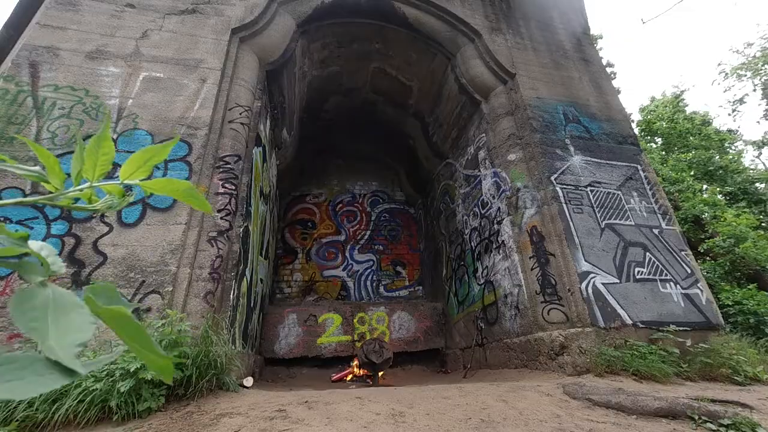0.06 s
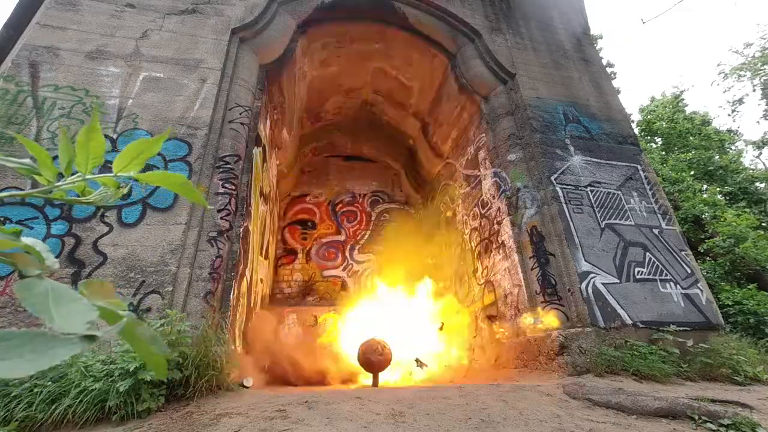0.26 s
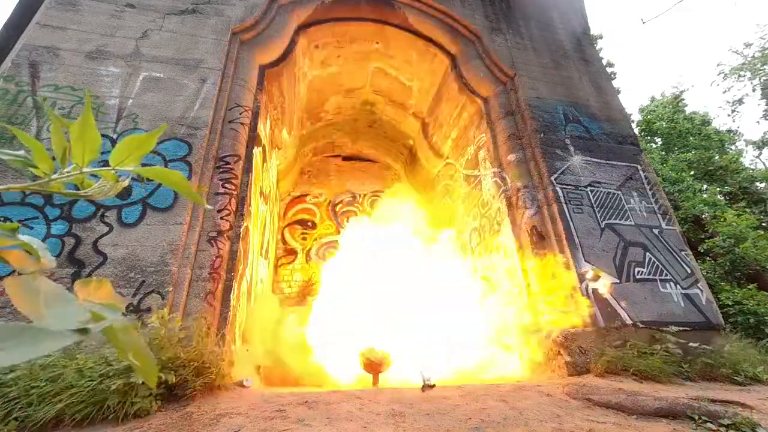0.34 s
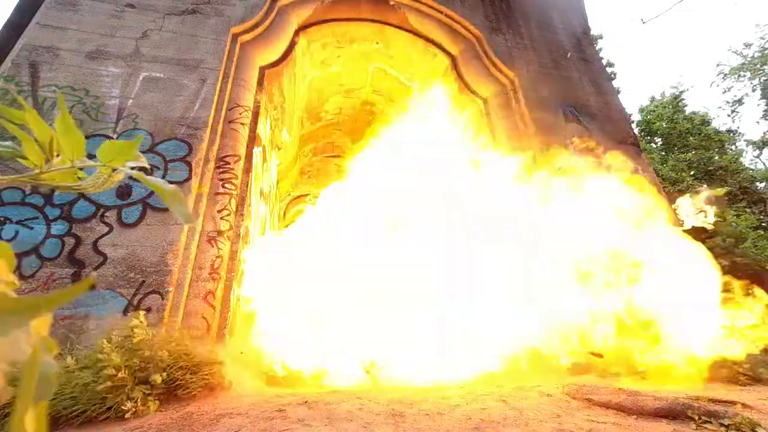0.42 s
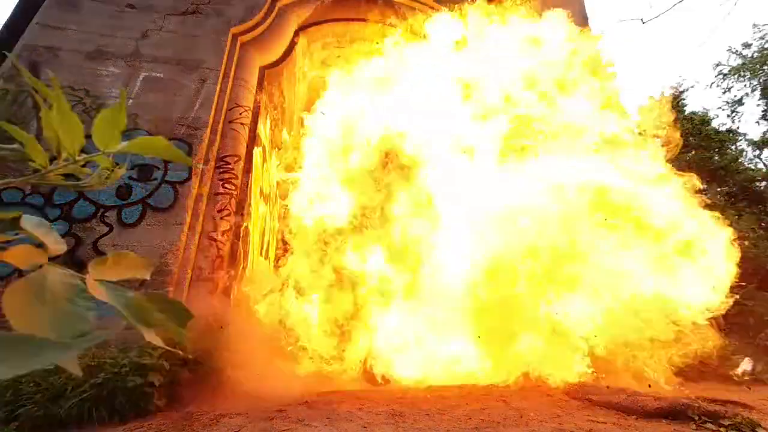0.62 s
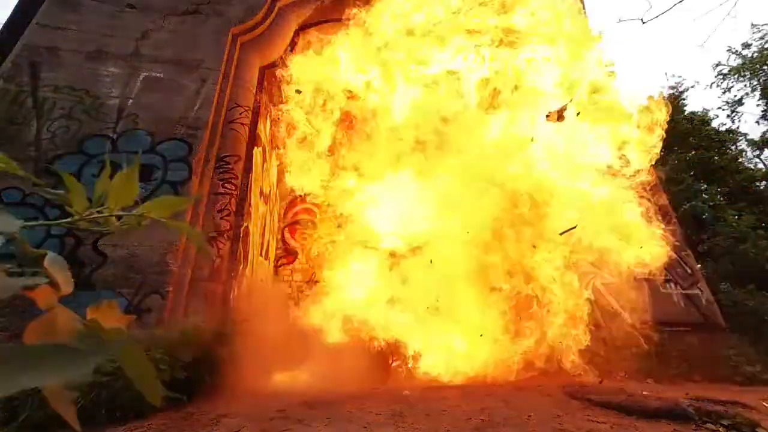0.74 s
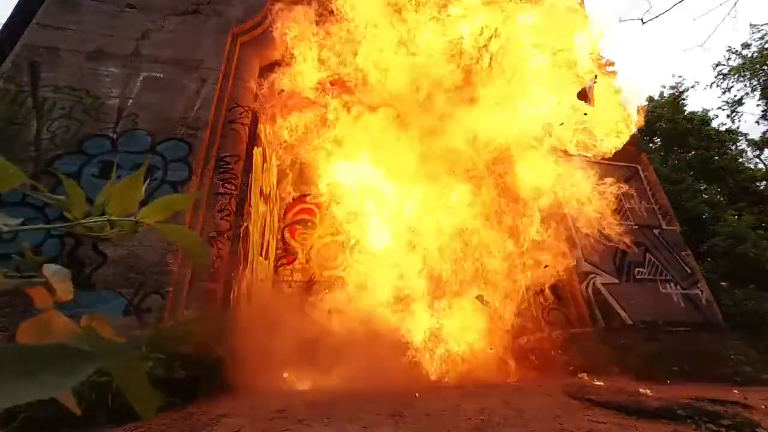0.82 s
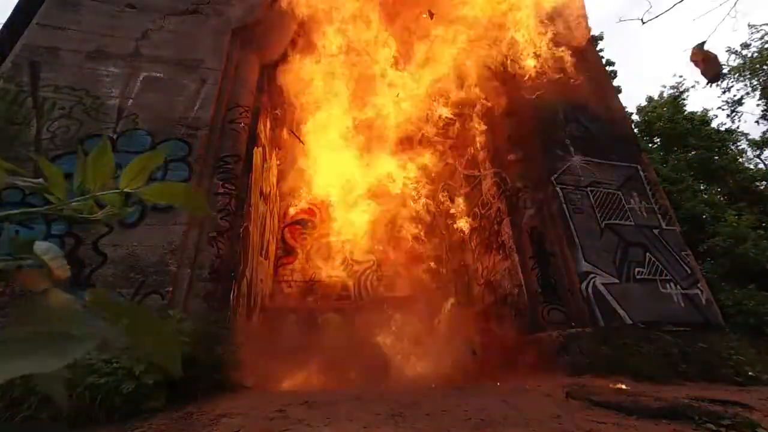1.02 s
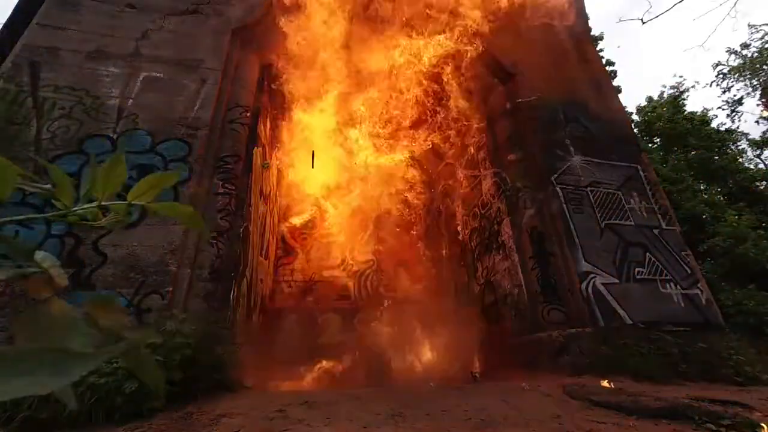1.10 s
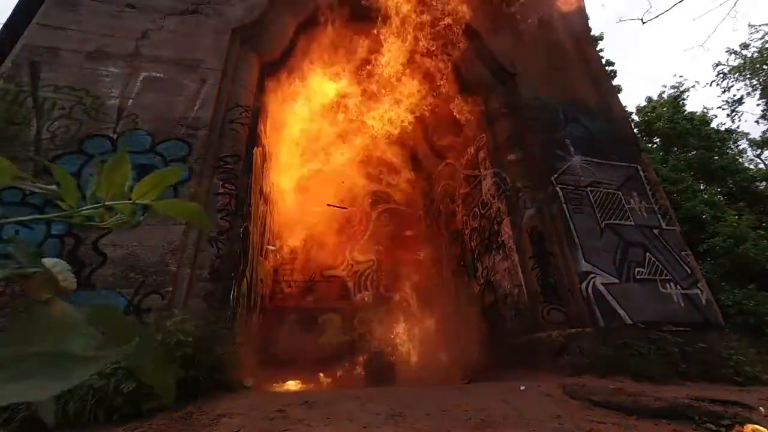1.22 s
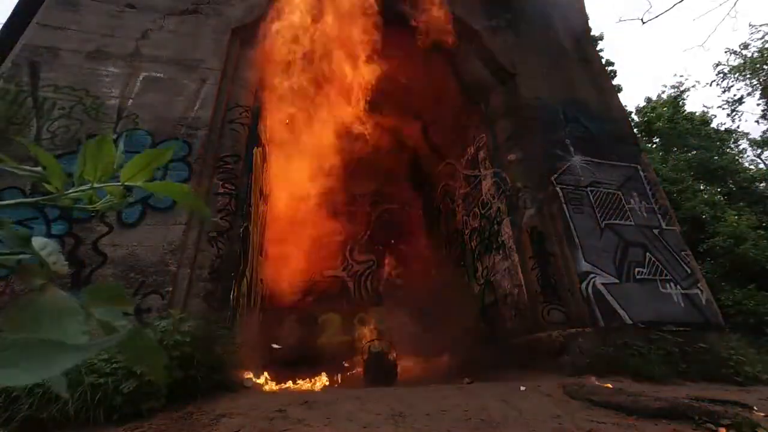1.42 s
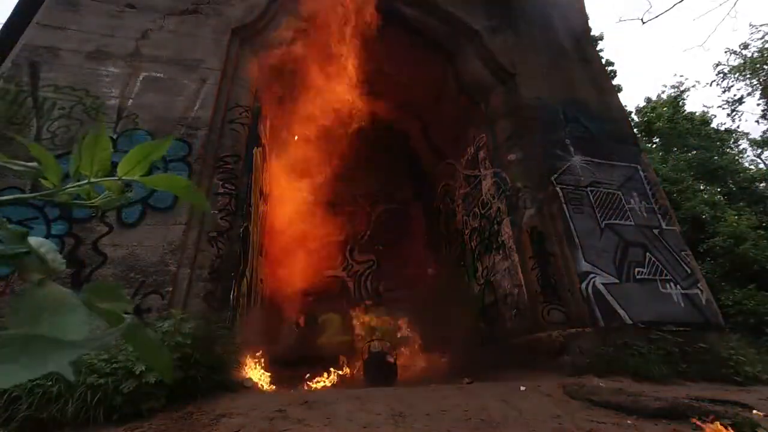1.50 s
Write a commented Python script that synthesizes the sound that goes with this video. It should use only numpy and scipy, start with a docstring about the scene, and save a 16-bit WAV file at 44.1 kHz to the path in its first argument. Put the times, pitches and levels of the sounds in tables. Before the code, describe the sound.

An explosion of a gas container cracks and booms, then flames rumble and debris lands.

```python
"""A concrete archway outdoors, where a gas cylinder bursts. Sharp shock fronts and ragged jets of gas
excite the arch's resonances. The gas catches in whumps, and the fireball swells into a deep boom
that buffets and overloads the microphone. Echoes roll back from the building and trees, the flames
rumble and crackle on, and debris lands, one piece ringing close by."""
import sys
import numpy as np
from scipy import signal
from scipy.fft import rfft, irfft
from scipy.io import wavfile
from scipy.ndimage import uniform_filter1d

SR = 44100
rng = np.random.default_rng(int(sys.argv[2]) if len(sys.argv) > 2 else 0)


def dump(signal):
    """Clip the signal to [-1, 1] and save it as 16-bit WAV at the path in sys.argv[1]."""
    limited = np.clip(np.atleast_2d(signal).T, -1, 1)
    pcm = np.round(limited * 32767).astype(np.int16)
    wavfile.write(sys.argv[1], SR, pcm)


N = 68355
TIME = np.arange(N) / SR
FREQS = np.maximum(np.fft.rfftfreq(N, 1 / SR), 1)


def from_db(db):
    """Decibels to gain."""
    return 10 ** (np.asarray(db) / 20)


def unit_rms(x):
    """Scale to rms 1."""
    return x / np.sqrt(np.mean(x ** 2) + 1e-20)


def envelope(rows):
    """Gain over time from (time [s], level [dB]) rows."""
    return from_db(np.interp(TIME, *np.transpose(rows)))


def over_freqs(rows):
    """Interpolate (frequency [Hz], value) rows on a log axis."""
    hz, value = np.transpose(rows)
    return np.interp(np.log(FREQS), np.log(hz), value)


def bandpass(x, low_hz, high_hz):
    """Second-order low-pass, then high-pass."""
    for hz, kind in (high_hz, "low"), (low_hz, "high"):
        x = signal.sosfilt(signal.butter(2, hz, kind, fs=SR, output="sos"), x + 1e-18)
    return x


def flutter(depth_db, rate_hz):
    """Random gain that wavers by depth_db rms."""
    drift = irfft(rfft(rng.standard_normal(N)) / (1 + (FREQS / rate_hz) ** 2), N)
    return from_db(depth_db * unit_rms(drift))


# left-right likeness of the sound field: (frequency [Hz], correlation)
STEREO_CORRELATION = [(60, 1), (300, 0.99), (640, 0.93), (1400, 0.58), (3100, 0.04), (7000, 0),
                      (15000, 0.15)]


def noise(spectrum):
    """Stereo noise of rms 1, rolled off beyond the spectrum's ends, alike on both sides in the bass."""
    mid, side = rfft(rng.standard_normal((2, N)))
    alike = over_freqs(STEREO_CORRELATION)
    stereo = np.sqrt(1 + alike) * mid + np.sqrt(1 - alike) * side * np.array([[1], [-1]])
    skirts = 1 / np.sqrt(1 + (spectrum[0][0] / FREQS) ** 6 + (FREQS / spectrum[-1][0] / 1.3) ** 6)
    return unit_rms(irfft(stereo * from_db(over_freqs(spectrum)) * skirts, N))


def octave_bands(x):
    """Overlapping bands as (octaves above 600 Hz, signal)."""
    position = np.clip(np.log2(FREQS / 600), -2, 5)
    return [(k, irfft(rfft(x) * np.maximum(1 - abs(position - k), 0), N)) for k in range(-2, 6)]


def steady(x, window_s):
    """Even out the chance swells of a noise."""
    size = int(window_s * SR / 2)
    power = uniform_filter1d(uniform_filter1d(np.mean(x ** 2, axis=0), size), size)
    return x / np.sqrt(power + 1e-9)


def burst(start_s, attack_s, hold_s, decay_db_per_s):
    """Linear attack, hold, exponential release."""
    age = TIME - start_s
    rise = np.clip(age / max(attack_s, 1e-4), 0, 1)
    return rise * from_db(-decay_db_per_s * np.maximum(age - attack_s - hold_s, 0))


def hits(rows, attack_s, hold_s):
    """Summed bursts from (time [s], level [dB], decay [dB/s]) rows."""
    return sum(from_db(db) * burst(s, attack_s, hold_s, decay) for s, db, decay in rows)


def ring(start_s, attack_s, hz, t60_s):
    """A struck mode, out of phase between the two sides."""
    offset_cycles = rng.uniform(0, 0.57, (2, 1))
    tone = np.sin(2 * np.pi * (hz * (TIME - start_s) + offset_cycles))
    return burst(start_s, attack_s, 0, 60 / t60_s) * tone


def resonate(x, modes, width_hz):
    """Boost or cut narrow bands, as a hollow space does."""
    radius = np.exp(-np.pi * width_hz / SR)
    out = x
    for hz, db in modes:
        poles = [1, -2 * radius * np.cos(2 * np.pi * hz / SR), radius ** 2]
        band = (1 - radius ** 2) / 2 * signal.lfilter([1, 0, -1], poles, x + 1e-18)
        out = out + (from_db(db) - 1) * band
    return out


# background air: (frequency [Hz], level [dB])
AIR_SPECTRUM = [(25, -3), (65, -0.5), (100, -4.5), (240, -7), (350, -16.5), (1000, -18), (1700, -30.5),
                (5000, -34.5), (7000, -50), (16000, -34)]


def outdoor_air():
    """Quiet, even background, mostly bass."""
    return from_db(-54.5) * noise(AIR_SPECTRUM)


# ignitions: (time [s], level [dB], attack [s], hold [s], decay [dB/s])
WHUMPS = [(0.19, -28.5, 0.013, 0.09, 127), (0.28, -13, 0.011, 0.038, 295), (0.432, -16, 0.011, 0.0072, 231),
          (0.507, -20.5, 0.0021, 0.0065, 122)]
# igniting gas: (frequency [Hz], level [dB])
WHUMP_SPECTRUM = [(85, -1), (115, 0.5), (135, -10), (175, 6), (205, -15), (235, -6), (300, -18.5),
                  (600, -27), (1500, -73)]


def ignition():
    """The gas catches in low whumps."""
    level = sum(from_db(db) * burst(s, attack, hold, decay) for s, db, attack, hold, decay in WHUMPS)
    return steady(noise(WHUMP_SPECTRUM), 0.06) * level


# gas jets: (time [s], level [dB], attack [s], hold at 600 Hz [s], decay at 600 Hz [dB/s])
JETS = [(.2022, -17.5, .0006, .005, 520), (.2190, -18, .002, .009, 500), (.2520, -16, .009, .036, 120)]
# escaping gas: (frequency [Hz], level [dB])
JET_SPECTRUM = [(330, -5), (400, -8.5), (600, -2), (760, -5.5), (930, -12), (1100, -12), (1700, -14.5),
                (2500, -18), (4600, -19.5), (5800, -26), (7000, -33.5), (8500, -27.5), (10500, -23.5),
                (13000, -34), (16000, -34)]


def jets(lag_s_per_octave=0.0063, decay_tilt=0.076):
    """Ragged bursts of gas; the treble, chopped by small shocks, holds longer and then dies faster."""
    gas = steady(noise(JET_SPECTRUM), 0.032) * flutter(depth_db=1, rate_hz=300)
    rasp = unit_rms(flutter(depth_db=0.5, rate_hz=450))
    longest_hold_s = max(row[3] for row in JETS)
    out = 0
    for octave, band in octave_bands(gas):
        stretch = 1 + lag_s_per_octave * abs(octave) / longest_hold_s
        level = sum(from_db(db) * burst(s, attack, hold * stretch, decay * 2 ** (decay_tilt * octave))
                    for s, db, attack, hold, decay in JETS)
        out += band * level * (rasp if octave > 0 else 1)
    return out


# treble snaps: (time [s], level [dB], decay [dB/s])
SNAPS = [(.2030, -34.5, 450), (0.2235, -31, 500)]
# treble snaps: (frequency [Hz], level [dB])
SNAP_SPECTRUM = [(2000, 6), (3000, -4), (5000, -22), (7000, -22), (10500, 5), (13000, 5), (16000, -7)]


def bright_snaps():
    """Two bright treble snaps as the shock fronts hit the microphone."""
    return noise(SNAP_SPECTRUM) * hits(SNAPS, attack_s=0.00055, hold_s=0.002)


# shock fronts: (time [s], level [dB], length [ms])
SHOCKS = [(0.2032, -7, 2.02), (.2050, -19, 1.26), (.2180, -6, 2.4), (0.2237, -3, 1.54), (0.2618, -5, 1.48),
          (0.2669, -9.5, 1.97), (.2820, -4, 1.34)]


def shocks(echo_db=-9, echo_t60_s=0.064):
    """N-shaped pressure fronts, scattered by the archway's walls."""
    fronts = np.zeros(N)
    for s, db, ms in SHOCKS:
        phase = (TIME - s) * 1000 / ms
        fronts += from_db(db) * (1 - 2 * phase) * ((phase >= 0) & (phase < 1))
    fronts = bandpass(fronts, low_hz=326, high_hz=2320)
    walls = noise([(250, 0), (3000, -8), (12000, -1.5)]) * burst(0.0037, 0.0023, 0, 60 / echo_t60_s)
    walls /= np.sqrt(np.sum(walls ** 2) / 2)
    echoes = signal.fftconvolve(fronts[None], walls, axes=1)[:, :N]
    return fronts + from_db(echo_db) * echoes


# cylinder cavity: (frequency [Hz], gain [dB])
CYLINDER_MODES = [(420, 4.6), (580, 7.6), (720, 2.5)]


def cylinder_bark(x):
    """The ruptured cylinder resonates with a hollow bark."""
    return resonate(x, CYLINDER_MODES, width_hz=77)


# archway peaks and notches: (frequency [Hz], gain [dB])
ARCH_MODES = [(178, 9), (227, -4), (312, 6.5), (378, 5), (466, 3), (501, 2.5), (572, 1.5), (618, 3),
              (748, 6), (1080, 8), (1526, -7), (1712, 4)]


def archway(x):
    """The arch's narrow resonances colour the blast."""
    return resonate(x, ARCH_MODES, width_hz=14)


# boom swell: (time [s], level [dB])
BOOM_LEVEL = [(.205, -46), (.225, -37), (.25, -19.5), (.30, -15.5), (.35, -11.5), (.39, -9), (.45, -4.5),
              (.50, -8), (.55, -19), (.62, -28.5), (.70, -49), (.76, -51)]
# fireball turbulence: (frequency [Hz], level [dB])
BOOM_SPECTRUM = [(22, 6.5), (38, 8), (60, -1.5), (100, -4.5), (135, -13.5), (175, -13.5), (220, -24.5),
                 (400, -31.5), (900, -62)]
# air swings: (time [s], level [dB], frequency [Hz], t60 [s])
SURGES = [(0.4395, -6, 55, 0.088), (0.46, -10.5, 175, 0.078), (0.485, -0.5, 23.9, 0.43)]


def fireball():
    """Deep turbulence swells with the flame; surges leave the air swinging."""
    onset = burst(BOOM_LEVEL[0][0], 0.0042, 0, 0)
    boom = steady(noise(BOOM_SPECTRUM), 0.022) * envelope(BOOM_LEVEL) * onset
    swings = sum(from_db(db) * burst(s, 0, 0, 60 / t60) * np.sin(2 * np.pi * hz * (TIME - s))
                 for s, db, hz, t60 in SURGES)
    return boom + swings


# gusts: (time [s], level [dB], hold [s])
BUFFETS = [(0.246, -16, 0.0066), (0.473, -16.5, 0.019)]


def buffeting(decay_db_per_s=502):
    """Surging air hits each side of the microphone separately."""
    wind = steady(bandpass(rng.standard_normal((2, N)), low_hz=31, high_hz=91), 0.021)
    return wind * sum(from_db(db) * burst(s, 0.002, hold, decay_db_per_s) for s, db, hold in BUFFETS)


# outdoor echoes: (frequency [Hz], level [dB])
ROLL_SPECTRUM = [(88, -53), (150, -8.5), (286, -20.5), (368, -9.5), (439, -16.5), (484, -10), (675, -8.5),
                 (923, -17.5), (1190, -18), (4240, -28.5), (7040, -43), (10200, -38.5), (16000, -48)]


def rolling_echoes(peak_s=0.47, decay_db_per_s=40, decay_tilt=0.17):
    """Echoes from the building and trees build up after the main jet; the treble dies first."""
    start_s = JETS[-1][0]
    out = 0
    for octave, band in octave_bands(noise(ROLL_SPECTRUM)):
        out += band * burst(start_s, peak_s - start_s, 0, decay_db_per_s * 2 ** (decay_tilt * octave))
    return from_db(-32) * out


# flame rumble: (time [s], level [dB])
FIRE_LEVEL = [(.3, -59), (.7, -41.5), (1.1, -40.5), (1.25, -43), (1.38, -45), (1.52, -38)]
# flame rumble: (frequency [Hz], level [dB])
FIRE_SPECTRUM = [(20, -4.5), (70, 2), (160, -4), (280, -9.5), (600, -16.5), (1100, -28), (2500, -36),
                 (5000, -56), (7000, -70), (15000, -51)]
# crackle: (time [s], level [dB])
CRACKLE_LEVEL = [(.5, -63), (.9, -68), (1.15, -64.5), (1.28, -57.5), (1.37, -63), (1.52, -56.5)]
# crackle: (frequency [Hz], level [dB])
CRACKLE_SPECTRUM = [(1500, -8), (3000, -4.5), (5000, -8.5), (7000, -14), (10000, 2), (15000, -10.5)]


def flames(crackles_per_s=54, crackle_decay_s=0.002, spread_db=0.5):
    """From the first jet on, flames rumble and flicker under a fine sizzle with small crackles."""
    triggers = rng.random(N) < crackles_per_s / SR
    sizes = from_db(spread_db * np.minimum(rng.exponential(1, N), 3))
    crackles = signal.lfilter([1], [1, -np.exp(-1 / (crackle_decay_s * SR))], triggers * sizes)
    sizzle = noise(CRACKLE_SPECTRUM) * unit_rms(0.91 * crackles + 0.5) * envelope(CRACKLE_LEVEL)
    rumble = steady(noise(FIRE_SPECTRUM), 0.073) * envelope(FIRE_LEVEL)
    rumble *= flutter(depth_db=1.5, rate_hz=30)
    return (rumble + sizzle) * (TIME > JETS[0][0])


# dip in the blast: (time [s], gain [dB])
BLAST_DIP = [(.473, 0), (.478, -11), (.499, -10), (.503, 0)]


def dip(blast, above_hz=280):
    """Mids and treble dip briefly at the height of the boom."""
    bass = irfft(rfft(blast) / (1 + (FREQS / above_hz) ** 4), N)
    return bass + (blast - bass) * envelope(BLAST_DIP)


# stone landings: (time [s], level [dB], pitch [Hz], t60 [s])
STONES = [(.8765, -45, 2950, .016), (1.0690, -42, 2400, .014), (1.0717, -44, 2300, .008),
          (1.3008, -42, 10200, .006), (1.3049, -38, 2650, .010), (1.3985, -38.5, 2850, .012),
          (1.4063, -48, 5500, .012)]
# stone modes: (ratio to pitch, level [dB])
STONE_PARTIALS = [(.72, -10), (1, -1.5), (1.45, -28)]


def stones(attack_s=0.00039, scatter_gain=0.36):
    """Small stones land with a dry click and a faint, longer scatter."""
    out = 0
    for s, db, pitch_hz, t60 in STONES:
        modes = [(pitch_hz * ratio, mode_db) for ratio, mode_db in STONE_PARTIALS]
        click = sum(from_db(mode_db) * ring(s, attack_s, hz, t60) for hz, mode_db in modes)
        scatter = noise(modes) * burst(s, attack_s, 0, 20 / t60)
        out += from_db(db) * (click + scatter_gain * scatter)
    return out


# impacts on earth: (time [s], level [dB], decay [dB/s])
THUDS = [(1.0651, -41, 903), (1.4595, -42.5, 698)]
# struck earth: (frequency [Hz], level [dB])
THUD_SPECTRUM = [(150, -2), (280, -4), (450, 1), (640, 5), (850, 8), (1050, -7), (1500, -25), (2500, -25)]
# grit sprays: (time [s], level [dB], decay [dB/s])
GRIT = [(1.299, -48, 1502), (1.4610, -30, 908), (1.48, -45, 707)]
# flying grit: (frequency [Hz], level [dB])
GRIT_SPECTRUM = [(150, 18), (300, -1), (700, 4), (1050, -5), (1900, -17), (3500, 3.5), (5500, -4),
                 (7000, -11), (8500, -2.5), (12500, -1.5), (16000, -8)]


def thuds_and_grit():
    """Heavier pieces thud into the earth; grit flies where pieces land or bounce."""
    return sum(steady(noise(spectrum), 0.012) * hits(rows, attack_s=0.00064, hold_s=0.00066)
               for spectrum, rows in [(GRIT_SPECTRUM, GRIT), (THUD_SPECTRUM, THUDS)])


# scrap modes: (frequency [Hz], level [dB], t60 [s])
SCRAP_MODES = [(627, -37, 0.058), (1026, -34.5, 0.072), (3200, -36, 0.02), (3530, -27, 0.019),
               (4260, -28, .015), (4290, -24.5, 0.023), (5260, -29, 0.016)]


def ringing_scrap(landing_s=1.4592):
    """A hard scrap lands close by and rings briefly."""
    return sum(from_db(db) * ring(landing_s, 0.00027, hz, t60) for hz, db, t60 in SCRAP_MODES)


def scene():
    """The explosion and its aftermath over quiet outdoor air."""
    blast = archway(cylinder_bark(shocks()) + jets() + rolling_echoes()) + ignition() + fireball()
    aftermath = buffeting() + flames() + stones() + thuds_and_grit() + ringing_scrap()
    return dip(blast) + aftermath + outdoor_air() + bright_snaps()


def record(dry):
    """The overloaded microphone rounds off the peaks; a steep low-pass cuts the top."""
    stopband_hz = 16400
    rounded = dry / (1 + dry ** 4) ** 0.25
    return signal.sosfilt(signal.cheby2(14, 60, stopband_hz, fs=SR, output="sos"), rounded)


dry = scene()
out = record(dry)
dump(out)
```